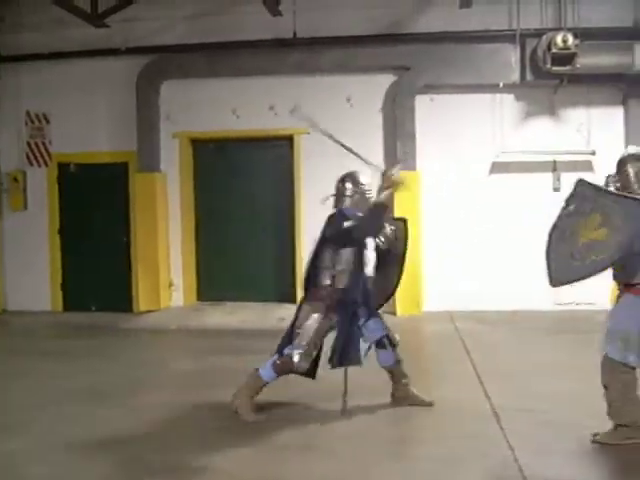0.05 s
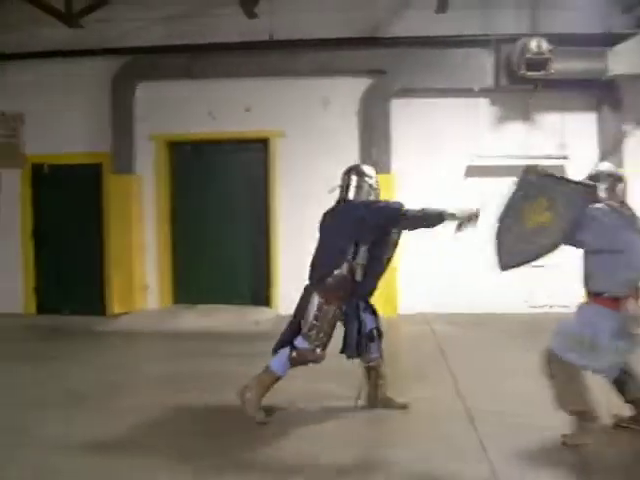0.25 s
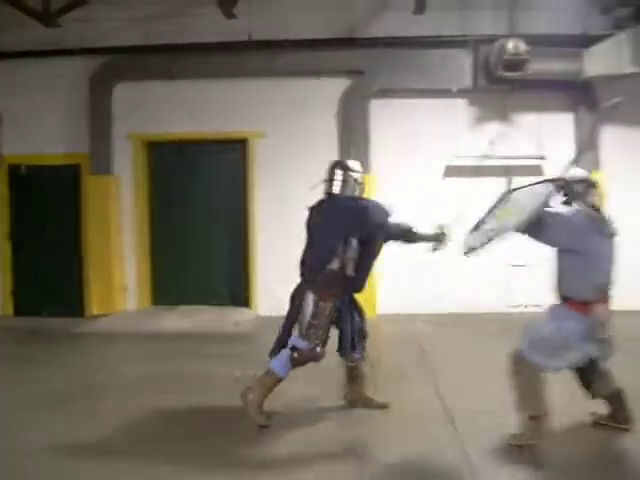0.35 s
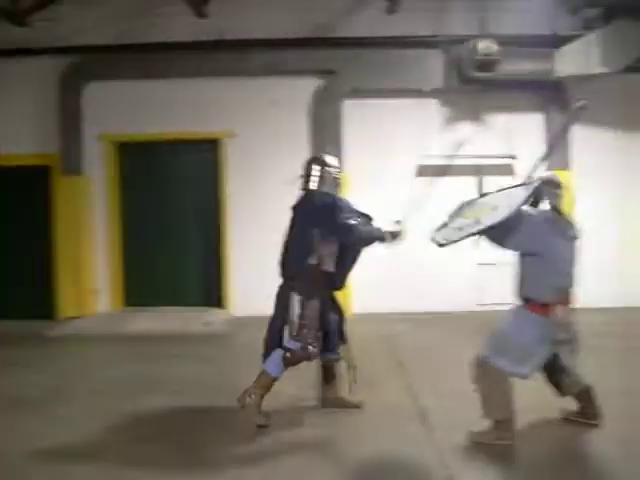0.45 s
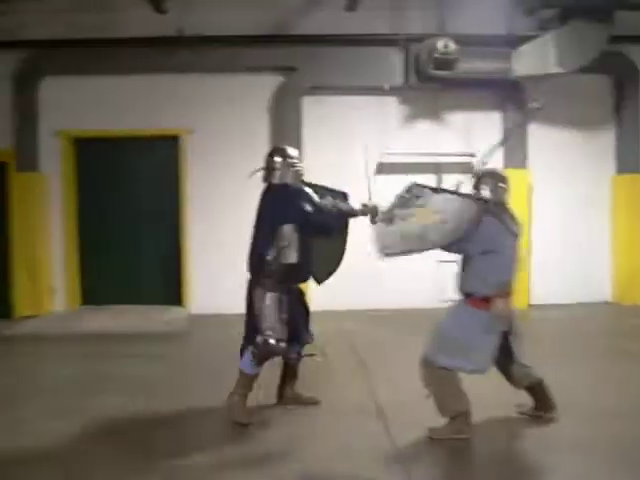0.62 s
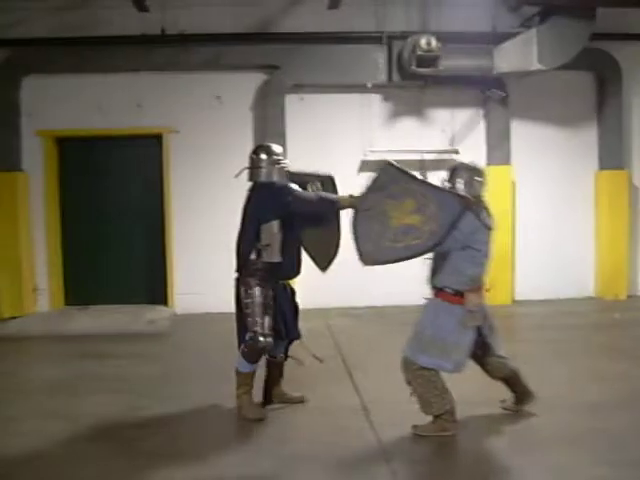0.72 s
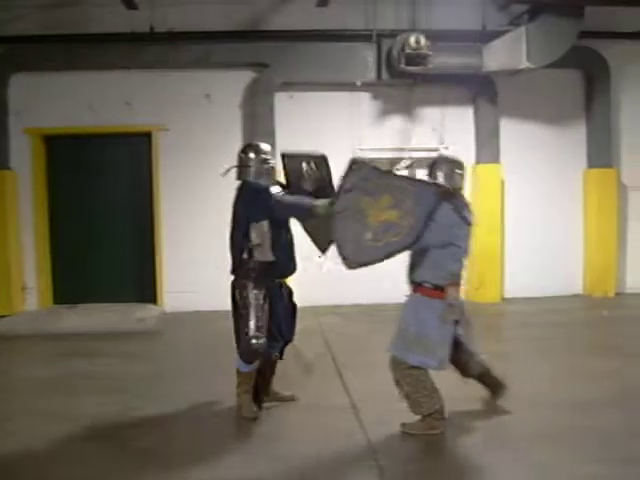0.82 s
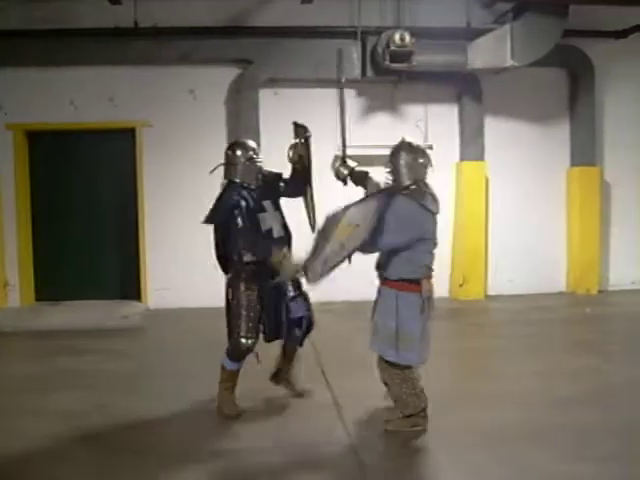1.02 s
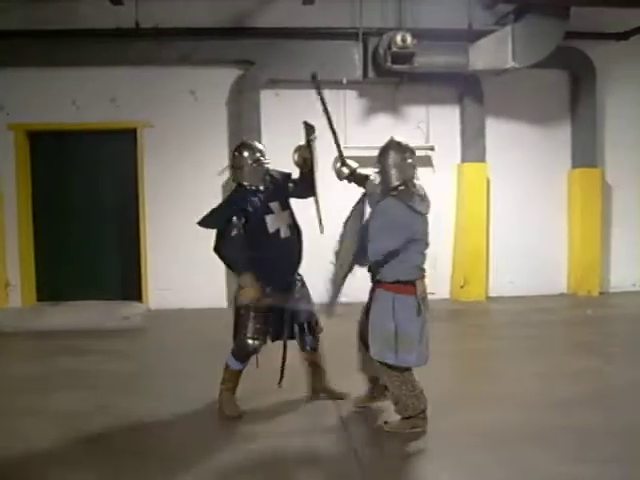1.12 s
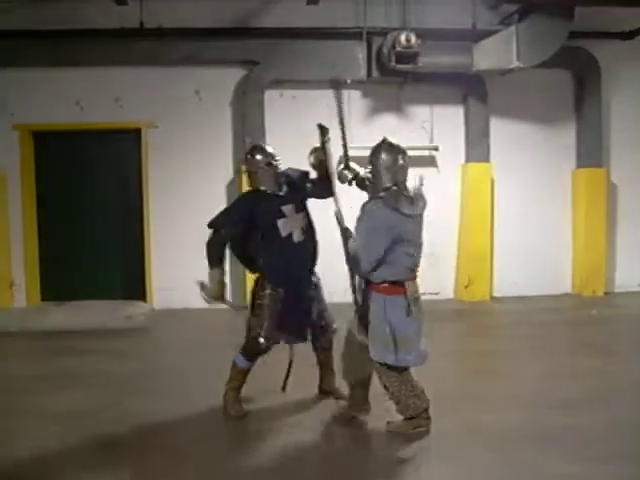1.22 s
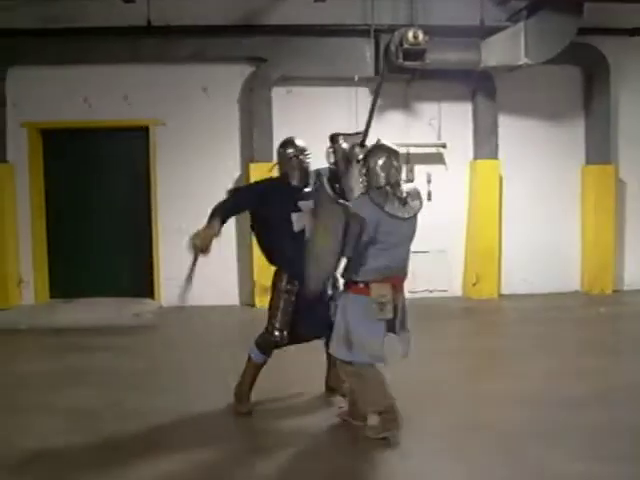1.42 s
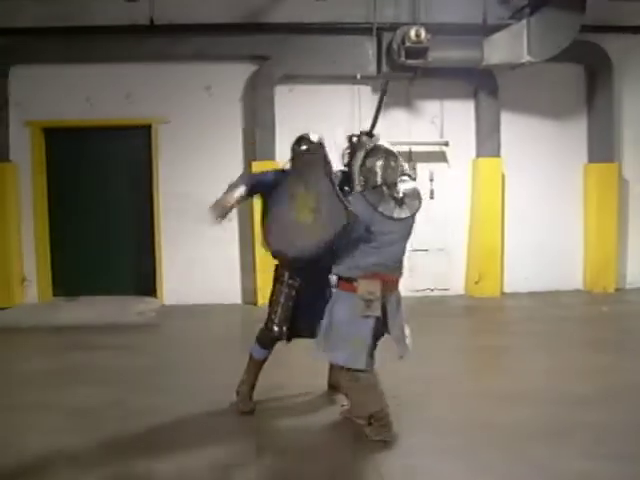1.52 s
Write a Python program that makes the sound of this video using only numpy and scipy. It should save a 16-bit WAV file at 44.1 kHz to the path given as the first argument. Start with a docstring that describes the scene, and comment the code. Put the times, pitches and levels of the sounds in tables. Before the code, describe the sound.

A padded stick slams a shield at about 0.25 seconds with a loud, hollow knock, after a few faint armour clinks. Around 0.7 seconds come boot thuds, more clinks and a faint slap. Two lighter blows crack at 1.1 and 1.2 seconds, the first with a woody rebound, and footsteps trail off by 1.5 seconds. Everything echoes in a large bare hall, sharpened by a small microphone.

```python
"""Two armoured fighters spar in a bare concrete hall. Plates clink, then a padded stick slams into a
shield at 0.25 s and the board gives a hollow knock. Near 0.7 s come boots, clinks and a faint slap.
Two lighter blows crack on rim or armour at 1.1 and 1.2 s, the first with a woody rebound, and footwork
trails off. The hall rings long after every contact, and the port of a small camera microphone adds
a sharp resonance in the upper mids."""
import sys
import numpy as np
from scipy import signal
from scipy.fft import rfft, irfft
from scipy.io import wavfile
from scipy.ndimage import uniform_filter1d

SR = 44100
rng = np.random.default_rng(int(sys.argv[2]) if len(sys.argv) > 2 else 0)


def unload_wav(signal):
    """Save mono or channel-first audio to the path in sys.argv[1] as 16-bit WAV at rate SR, clipped to [-1, 1]."""
    wavfile.write(
        sys.argv[1],
        SR,
        np.round(np.clip(np.atleast_2d(signal).T, -1, 1) * 32767).astype(np.int16),
    )


N = 68355
T, FREQS = np.arange(N) / SR, np.fft.rfftfreq(2 * N, 1 / SR)
HIT_N = 6144  # samples in one contact
HIT_T, HIT_FREQS = T[:HIT_N], np.fft.rfftfreq(2 * HIT_N, 1 / SR)

# stick slaps on the shield face, and the first blow's early wall reflection at 0.268 s
# (time [s], level [dB], t60 [s], tilt [dB/octave], hall send [dB])
SLAPS = [(0.2473, -23, 0.0098, -1, 3.5), (0.2502, -15.5, 0.039, -0.08, 1.5), (0.2554, -23.5, 0.0035, 1, 5),
         (0.2625, -14, 0.017, 2.5, -6.5), (0.2682, -18.5, .05, 2.5, -1.5), (.731, -30.5, .05, 0.7, 7),
         (.755, -33.5, 0.17, 1.2, 4)]
# mid-heavy tone of a slap (frequency [Hz], gain [dB])
SLAP_EQ = [(40, -46), (150, -17), (260, -11), (380, -3.5), (520, -3.5), (800, -3), (1100, -3.5),
           (1600, -5.5), (2100, -9.5), (2700, -10), (3300, -11.5), (4200, -14.5), (6500, -14), (10000, -17),
           (12000, -16)]
# stick on a hard rim or armour (time [s], level [dB], t60 [s], tilt [dB/octave], hall send [dB])
CRACKS = [(1.1067, -24, .016, 6.8, -7), (1.1189, -34, 0.035, 1.5, -7), (1.167, -38.5, 0.015, -0.5, -9),
          (1.2225, -25, 0.028, 0.5, 2), (1.2306, -29.5, .055, 0.5, -3)]
# harder tone of a crack (frequency [Hz], gain [dB])
CRACK_EQ = [(40, -45), (220, -19), (370, -2.5), (520, -7), (680, -2.5), (1200, -8), (2000, -10.5),
            (2700, -12), (3300, -11.5), (3800, -9.5), (4600, -9), (5400, -9), (7500, -12), (10000, -19),
            (12000, -19.5)]
# modes of the stick's shaft (frequency [Hz], gain [dB], t60 [s])
SHAFT_MODES = [(2242, 4, 0.021), (2884, -3.5, 0.019), (4180, 1, 0.012), (4960, -10, 0.016)]
# the shield board gives way under a blow (time [s], level [dB], pitch [ratio], hall send [dB])
KNOCKS = [(.2527, -14.5, 1.036, -2.5), (1.1078, -34, 1.092, -3), (1.2235, -36, .48, 2.5)]
# modes of the board at pitch 1 (frequency [Hz], gain [dB], t60 [s])
BOARD_MODES = [(388.5, -12, 0.13), (724, 7.5, 0.035), (795, 8.5, 0.041), (1450, -16, 0.033)]
# armour plates touching (time [s], level [dB], t60 [s], hall send [dB])
CLINKS = [(.004, -46.5, 0.15, -2.5), (0.063, -59, 0.016, -3), (0.109, -46.5, 0.043, 10.5),
          (.128, -39.5, 0.038, -2), (0.1359, -37.5, 0.03, -2.5), (.176, -42.5, 0.038, -4),
          (0.655, -38.5, 0.032, -2), (0.6757, -34, 0.033, 3), (0.697, -46, 0.015, -10),
          (.715, -29.5, 0.021, -21), (.75, -39, 0.037, -11), (.8105, -40, 0.034, -11),
          (.953, -40.5, 0.051, 2), (1.007, -49.5, 0.015, -1), (1.027, -40.5, 0.061, -2.5),
          (1.118, -29, 0.032, 0.5), (1.434, -59, .02, -8)]
# thin, bright tone of a plate (frequency [Hz], gain [dB])
PLATE_EQ = [(200, -57), (900, -16), (1600, -7), (2100, -2), (2800, -10.5), (3250, -1), (3700, -6.5),
            (4600, -1.5), (6200, -0.5), (8000, -0.5), (10500, -2), (12000, -13)]
# boots and bodies landing (time [s], level [dB], t60 [s], tilt [dB/octave], hall send [dB])
THUDS = [(.652, -36.5, 0.07, -4.5, 2.5), (.664, -34, 0.031, -1, 1.5), (.738, -38, 0.054, -1.5, -10),
         (1.129, -34, 0.17, -7.5, -2.5), (1.223, -32.5, 0.051, -0.5, -7), (1.263, -33.5, 0.042, 3.5, -3),
         (1.326, -37.5, 0.055, 3.5, 4.5), (1.418, -40, 0.04, 3.5, 1.5), (1.49, -46, 0.07, 3, 7.5)]
# dull tone of a landing (frequency [Hz], gain [dB])
THUD_EQ = [(40, -42), (90, -14.5), (150, -16), (230, -8.5), (350, 2), (500, 0), (720, 0), (1200, -19),
           (2500, -23.5), (8000, -46)]
# decay of the hall's diffuse tail (frequency [Hz], t60 [s])
HALL_DECAY = [(100, 1.16), (350, 1.29), (800, 1.765), (1800, 2.25), (3300, 1.546), (5500, 1.25),
              (11000, 0.83)]
# distinct reflections off the walls (delay [s], gain [dB])
WALL_ECHOES = [(0.018, -18.5), (0.0195, -18), (0.0506, -14)]
# colour of the room tone (frequency [Hz], gain [dB])
ROOM_TONE_EQ = [(25, -20), (75, 0.5), (125, 0.5), (180, -12), (400, -7), (700, -7), (1500, -12),
                (2900, -17.5), (3230, -4.5), (3600, -23), (6000, -17), (11000, -24)]
# the camera's treble roll-off (frequency [Hz], gain [dB])
TREBLE_ROLLOFF = [(10000, 0), (11000, -2.5), (11800, -14)]

PORT_HZ, PORT_Q = 3297, 7.77  # resonance of the microphone port


def stick_blows():
    """Shield slaps with the first blow's wall reflection, cracks on hard edges, one ringing rebound."""
    slaps = [contact(burst(SLAP_EQ, t60, tilt), at, db, send) for at, db, t60, tilt, send in SLAPS]
    cracks = [contact(burst(CRACK_EQ, t60, tilt), at, db, send) for at, db, t60, tilt, send in CRACKS]
    rebound = contact(ring(SHAFT_MODES), at_s=1.119, level_db=-33, send_db=-9)
    return slaps + cracks + [rebound]


def shield_knocks():
    """The board gives under a blow and its modes sound a hollow knock."""
    return [contact(ring(BOARD_MODES, pitch), at, db, send) for at, db, pitch, send in KNOCKS]


def armour_clinks():
    """Strapped plates touch in short, bright clinks."""
    return [contact(burst(PLATE_EQ, t60), at, db, send) for at, db, t60, send in CLINKS]


def footwork():
    """Boots land and bodies close in with dull thuds."""
    return [contact(burst(THUD_EQ, t60, tilt), at, db, send) for at, db, t60, tilt, send in THUDS]


def burst(eq, t60, tilt_db=0, evenness=0.62):
    """An impact's crowd of fast-dying resonances: decaying noise, partly evened out, then coloured."""
    spectrum = rfft(rng.standard_normal(HIT_N) * fade(t60, HIT_T), 2 * HIT_N)
    smoothed_power = uniform_filter1d(np.abs(spectrum) ** 2, size=110)
    chance_db = 10 * np.log10(np.abs(smoothed_power) + 1e-9)
    colour_db = curve(eq, HIT_FREQS) + tilt_db * np.log2((HIT_FREQS + 1) / PORT_HZ)
    return irfft(spectrum * minimum_phase(colour_db - evenness * chance_db))[:HIT_N]


def ring(modes, pitch=1, attack_s=0.00068):
    """Damped modes of a struck body; pitching down stretches both attack and decay."""
    t = HIT_T * pitch
    tone = sum(amp(db) * fade(t60, t) * np.sin(2 * np.pi * hz * t) for hz, db, t60 in modes)
    return tone * (1 - np.exp(-t / attack_s))


def contact(hit, at_s, level_db, send_db):
    """Place a hit as (direct sound, hall send); its level is the rms if its energy filled 5 ms."""
    hit = amp(level_db) * unit_energy(hit) * np.sqrt(0.005 * SR)
    direct = np.pad(hit, (round(at_s * SR), N))[:N]
    return direct, amp(send_db) * direct


def hall_response(early_t60_s=0.57, early_db=-2.5, build_s=0.011, grain=0.12):
    """A fresh hall impulse: long diffuse tail, grainy early field of nearby walls, distinct echoes."""
    hz, t, bands = signal.stft(rng.standard_normal(N), SR, nperseg=256)
    band_decay = fade(curve(HALL_DECAY, hz)[:, None], t)
    tail = signal.istft(bands * band_decay, SR, nperseg=256)[1][:N]
    clumps = np.exp(grain * rng.standard_normal(N)[np.arange(N) // 64])
    early = rng.standard_normal(N) * clumps * fade(early_t60_s)
    build = 1 - np.exp(-(T / build_s) ** 2)
    response = unit_energy(unit_energy(tail * build) + amp(early_db) * unit_energy(early * build))
    for delay, echo_db in WALL_ECHOES:
        response[round(delay * SR)] += amp(echo_db)
    return response


def room_tone(level_db=-57.5):
    """The hall's steady bed: low rumble and faint hiss."""
    noise = filtered(rng.standard_normal(N), amp(curve(ROOM_TONE_EQ, FREQS)))
    return amp(level_db) * noise / noise.std()


def amp(db):
    """Decibels to gain."""
    return 10 ** (np.asarray(db) / 20)


def curve(points, hz):
    """Read (frequency, value) points along a log frequency axis."""
    point_hz, values = np.transpose(points)
    return np.interp(np.log(hz + 1), np.log(point_hz + 1), values)


def fade(t60, t=T):
    """Exponential decay, 60 dB down after t60 seconds."""
    return amp(-60 * t / t60)


def unit_energy(x):
    """Scale x to an energy of one."""
    return x / np.sqrt(np.sum(x ** 2) + 1e-20)


def filtered(x, response):
    """Run x through a frequency response."""
    return irfft(rfft(x, 2 * N) * response)[:N]


def minimum_phase(gain_db):
    """An EQ response without pre-ringing, so attacks stay sharp."""
    cepstrum = irfft(np.log(amp(gain_db)))
    half = len(cepstrum) // 2
    cepstrum[1:half] *= 2
    cepstrum[half + 1:] = 0
    return np.exp(rfft(cepstrum))


def scene(positions=5):
    """The contacts take turns among several slightly different responses of the hall."""
    direct, sends = zip(*(stick_blows() + shield_knocks() + armour_clinks() + footwork()))
    buses = [sum(sends[k::positions]) for k in range(positions)]
    reverb = sum(signal.fftconvolve(bus, hall_response())[:N] for bus in buses)
    return (sum(direct) + reverb + room_tone())[None]


def record(dry, ceiling=0.68, low_cut_hz=78, top_hz=11800):
    """The microphone port rings and dulls the highs; then soft overload, low cut and band limit."""
    port = 1 / (1 - (FREQS / PORT_HZ) ** 2 + 1j * FREQS / (PORT_HZ * PORT_Q))
    coloured = filtered(dry[0], port)
    saturated = coloured / (1 + (coloured / ceiling) ** 4) ** 0.25
    low_cut = (1j * FREQS / (low_cut_hz + 1j * FREQS)) ** 2
    trimmed = filtered(saturated, low_cut * amp(curve(TREBLE_ROLLOFF, FREQS)))
    band_limit = signal.ellip(10, 0.2, 70, top_hz, fs=SR, output="sos")
    return signal.sosfilt(band_limit, trimmed)[None]


dry = scene()
out = record(dry)
unload_wav(out)
```